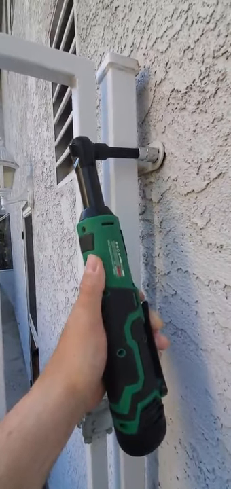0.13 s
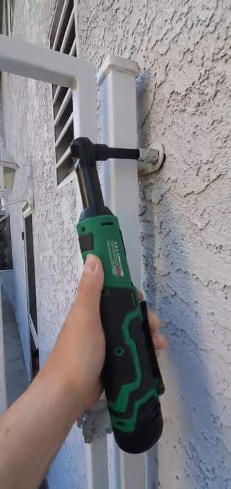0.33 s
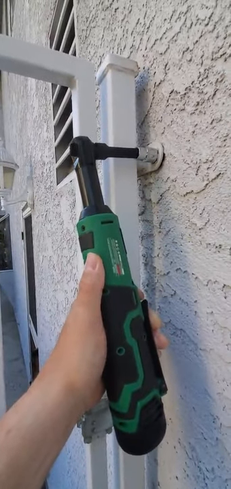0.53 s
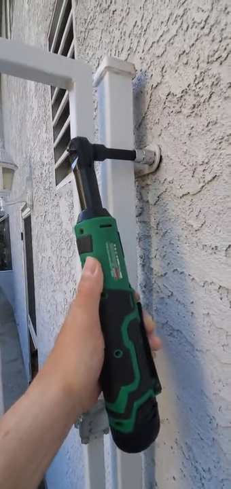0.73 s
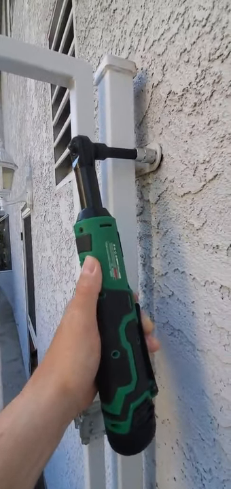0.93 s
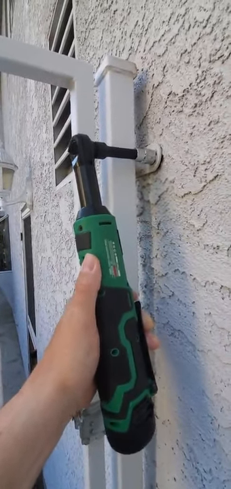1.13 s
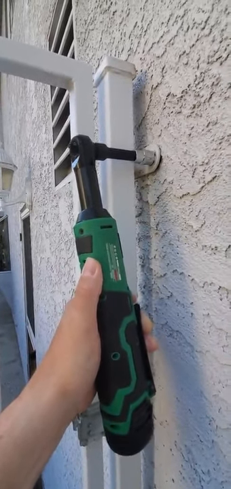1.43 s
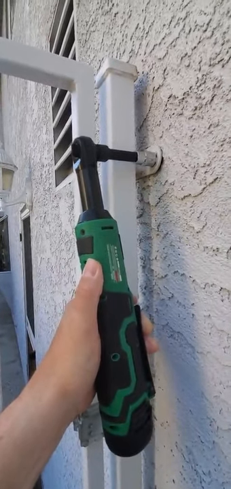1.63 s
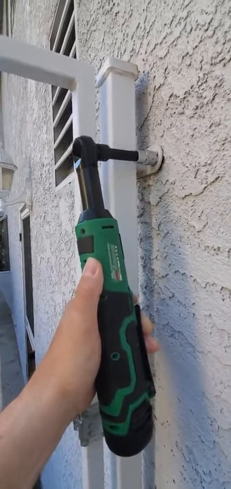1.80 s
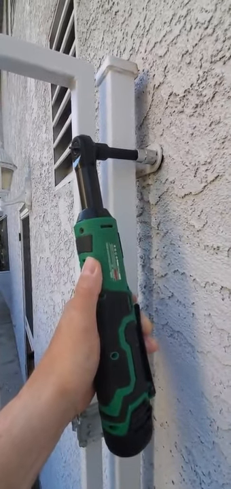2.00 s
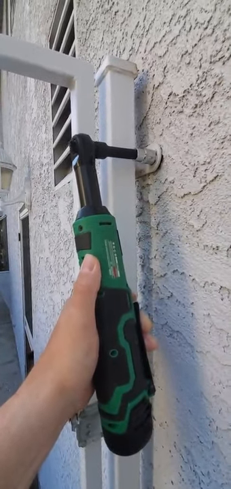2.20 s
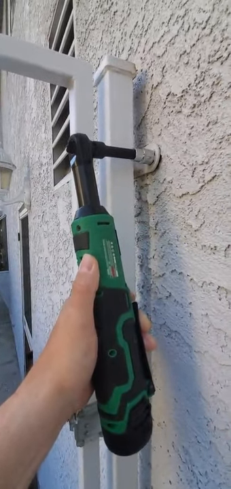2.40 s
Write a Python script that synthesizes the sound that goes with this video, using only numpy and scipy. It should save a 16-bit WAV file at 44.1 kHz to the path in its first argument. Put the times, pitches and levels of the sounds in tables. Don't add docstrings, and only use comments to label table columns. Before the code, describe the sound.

Close power ratchet clatter: hard metallic clicks speed up, ease off and quicken again outdoors

```python
import sys
import numpy as np
from scipy import signal
from scipy.fft import rfft, irfft, next_fast_len
from scipy.io import wavfile
from scipy.ndimage import uniform_filter1d

SR = 44100
rng = np.random.default_rng(int(sys.argv[2]) if len(sys.argv) > 2 else 0)


def gain_from_decibels(decibels):
    exponent = np.asarray(decibels, float) / 20
    return 10 ** exponent


def master(y):
    cut = np.clip(np.atleast_2d(y).T, -1, 1)
    pcm = np.round(cut * 32767)
    wavfile.write(sys.argv[1], SR, pcm.astype(np.int16))


N = 112455


def rms_one(x):
    return x / np.sqrt(np.mean(x ** 2) + 1e-20)


def in_time(rows):
    s, *columns = np.transpose(rows)
    return [np.interp(np.arange(N) / SR, s, column) for column in columns]


def at_hz(points, hz):
    table_hz, value = np.transpose(points)
    return np.interp(np.log(hz), np.log(table_hz), value)


def drift(rate_hz):
    r = np.exp(-2 * np.pi * rate_hz / SR)
    noise = rng.standard_normal(N + SR)
    return rms_one(signal.lfilter([1], [1, -2 * r, r * r], noise)[SR:])


def fade(x, t60):
    return signal.lfilter([1], [1, -gain_from_decibels(-60 / (t60 * SR))], x + 1e-18)


def band(x, low, high):
    # (pitch [Hz], likeness [0-1])
    likeness = [(60, 0.99), (130, .95), (250, 0.5), (600, 0.9), (1500, 0.18), (4000, 0.14), (9000, 0.17)]
    # (pitch [Hz], left over right [dB])
    left_over_right = [(60, -1), (180, .5), (350, 2.5), (800, 7.5), (2800, 3.5), (5500, 5.5), (9000, 11),
                       (14000, 8)]
    mid, side = signal.sosfilt(signal.butter(2, [low, high], "band", fs=SR, output="sos"), x)
    hz = np.sqrt(low * high)
    alike = np.clip(at_hz(likeness, hz), 0, 1)
    left_db = at_hz(left_over_right, hz) / 2
    ports = np.sqrt(1 + alike) * mid + np.sqrt(1 - alike) * side * [[1], [-1]]
    return gain_from_decibels(np.array([[left_db], [-left_db]])) * ports


def air():
    # (pitch [Hz], level [dB per Hz])
    air_colour = [(25, -40), (66, 10.5), (120, -7), (290, -28.5), (690, -57), (2500, -38), (5000, -36),
                  (9000, -52)]
    # (time [s], level [dB])
    breeze = [(0, -48.5), (.3, -52.5), (1.1, -51), (1.4, -56), (2.1, -66.5), (2.25, -50), (2.55, -52)]
    white = rng.standard_normal((2, 2, N))
    borders = np.geomspace(25, 16000, num=20)
    out = np.zeros((2, N))
    for k, (low, high) in enumerate(zip(borders[:-1], borders[1:])):
        lumps_db = at_hz(air_colour, np.sqrt(low * high)) + 2 * drift(0.69)
        out += gain_from_decibels(lumps_db) * band(white[k % 2], low, high)
    return gain_from_decibels(in_time(breeze)[0]) * rms_one(out)


def whine():
    # (time [s], pitch [Hz], level [dB])
    whine_path = [(0, 4343, -47.5), (.112, 4330, -49), (.118, 4696, -47.5), (.2, 4720, -42.5),
                  (.235, 4735, -43), (.255, 4740, -56), (.29, 4745, -48), (.315, 4745, -49),
                  (.335, 4745, -62), (.37, 4740, -52), (.47, 4740, -53), (.49, 4740, -62), (.53, 4735, -55),
                  (.58, 4720, -59), (.68, 4900, -110)]
    hz, db = in_time(whine_path)
    turn = 2 * np.pi * np.cumsum(hz) / SR
    stepped_up = np.arange(N) / SR > 0.115
    tone = np.sin(turn) * gain_from_decibels(8 * stepped_up * np.array([[-1], [1]]))
    for multiple, before_db, after_db in [(2, -11, -11), (3, -58, -15)]:
        tone = tone + gain_from_decibels(np.where(stepped_up, after_db, before_db)) * np.sin(multiple * turn)
    waver_db = 4 * (-0.4 + stepped_up) * np.array([drift(9.8), drift(81)])
    return np.sqrt(2) * gain_from_decibels(db + waver_db) * tone


def pawl_blows():
    # (time [s], tick peak [dB], knock [dB])
    switch = [
        (0.108, -51, -49),
        (1.408, -8, -66),
    ]
    # (time [s], tick peak [dB], knock [dB])
    creeping = [(0.223, -25.5, -59), (0.2404, -6, -43), (0.2467, -16, -61), (0.2506, -16, -54),
                (0.2536, -18, -55), (0.2689, -21, -23), (0.3197, -5.5, -64), (0.3464, -17.5, -20),
                (0.399, -9, -66), (0.4259, -18.5, -21.5), (0.4782, -11, -51), (0.508, -19, -20),
                (0.5601, -10.5, -56), (0.591, -17, -21), (0.627, -15.5, -54), (0.6398, -20, -16.5)]
    racing = [0.662, .674, 0.686, 0.696, 0.715, 0.728, 0.743, 0.757, 0.77, 0.786, 0.803, 0.841, 0.857,
              0.869, .883, .896, 0.913, 0.929, 0.939, 0.954, 0.97, 0.984, 0.996, 1.014, 1.024, 1.038, 1.056,
              1.072, 1.091]
    # (time [s], tick peak [dB])
    easing = [(1.1303, -15), (1.1493, -16.5), (1.1724, -17), (1.1962, -18.5), (1.222, -22), (1.242, -13.5),
              (1.281, -15.5), (1.2994, -25), (1.3132, -17.5), (1.3345, -14), (1.369, -17.5), (1.3848, -17),
              (1.4155, -16.5)]
    # (time [s], tick peak [dB], knock [dB])
    ticking = [(1.4484, -14.5, -54), (1.466, -97, -33), (1.4912, -7, -41), (1.509, -35, -31),
               (1.534, -10, -45), (1.5526, -41, -32.5), (1.578, -9.5, -43), (1.596, -35, -29),
               (1.62, -12.5, -36), (1.638, -38, -34.5), (1.6623, -8.5, -58), (1.68, -40, -38.5),
               (1.704, -11, -68), (1.723, -40, -34), (1.7478, -8, -51), (1.767, -38, -33.5),
               (1.7922, -9, -59), (1.8125, -28, -34.5), (1.838, -13, -52), (1.8509, -29, -27.5)]
    # (time [s], tick peak [dB], knock [dB])
    pulling = [(1.8718, -9, -44), (1.8833, -27, -37), (1.9025, -19, -52), (1.908, -14, -33.5),
               (1.93, -14, -31.5), (1.958, -11, -32), (1.971, -32, -31), (1.985, -13.5, -50),
               (2.0138, -11, -66), (2.0242, -35, -30), (2.0427, -8, -44), (2.0524, -14.5, -32.5),
               (2.0714, -11, -33), (2.0807, -19, -60), (2.0986, -14.5, -46), (2.126, -11.5, -45),
               (2.136, -14, -29.5), (2.1547, -24, -52), (2.1655, -19, -29.5), (2.1834, -28, -55),
               (2.1927, -25, -31),
               (2.1086, -12, -34), (2.211, -16, -51), (2.2144, -12, -55), (2.2212, -16, -31.5),
                  (2.24, -21, -54), (2.243, -14.5, -56), (2.2515, -6, -42), (2.2723, -14.5, -35),
                  (2.2802, -7, -29.5), (2.296, -12, -53), (2.3001, -9.5, -55), (2.309, -16.5, -42),
                  (2.338, -15, -25.5), (2.3601, -15, -40), (2.370, -30, -29), (2.388, -14, -34),
                  (2.398, -16, -44), (2.416, -26, -57), (2.427, -15, -29.5), (2.446, -25, -39),
                  (2.456, -12, -27.5), (2.472, -9, -37), (2.498, -9.5, -33), (2.524, -8, -37)]
    racing_ticks = [(s, -21.5) for s in racing]
    merged = [(s, db, db - 19) for s, db in racing_ticks + easing]
    return np.transpose(switch + creeping + merged + ticking + pulling)


def grit(rough_db, rate_hz):
    return rms_one(rng.standard_normal((2, 2, N)) * gain_from_decibels(rough_db * drift(rate_hz)))


def small_modes(x, count=110):
    t60_s, modes_db = 0.07, -1
    size = next_fast_len(N + SR // 4)
    hz = np.arange(size // 2 + 1) * SR / size
    lean = np.array([gain_from_decibels(10.2 * drift(2.24)) for _ in range(3)])
    lean = lean / np.sqrt(np.sum(lean ** 2, axis=0))
    out = 0
    for share in lean:
        response = np.ones((2, len(hz)), complex)
        for pitch, a, b in rng.random((count, 3)):
            mode_hz = 800 * 19 ** pitch
            width_hz = 1.1 / t60_s * (mode_hz / 1000) ** 0.55
            first = int((mode_hz - 12 * width_hz) * size / SR)
            last = int((mode_hz + 12 * width_hz) * size / SR)
            near = slice(first, last)
            strength = gain_from_decibels(modes_db) * np.array([[4 * a - 2], [4 * b - 2]])
            response[:, near] += strength / (1 + 1j * (hz[near] - mode_hz) / width_hz)
        response = response / np.sqrt(uniform_filter1d(np.abs(response) ** 2, size=size // 50))
        out = out + irfft(rfft(share * x, size) * response, size)[:, :N]
    return out


def resonance(x, hz, width_hz):
    r = np.exp(-np.pi * width_hz / SR)
    return signal.lfilter([(1 - r * r) / 2, 0, (r * r - 1) / 2], [1, -2 * r * np.cos(2 * np.pi * hz / SR), r * r], x)


def held(x):
    # (time [s], handle ring [dB], shell ring [dB], depth of the first hollow [0-1])
    grip = [(0, 0, -6, 0.7), (.28, 4, 7, .3), (.6, 0.5, 4.5, 0.18), (.7, -3, -22, 0.5), (.82, -13, -5, .98),
            (.9, 2.5, 4, .95), (.99, -9, -8, 0.7), (1.05, 5, 16.5, 0.37), (1.12, 3, -1, 0.1),
            (1.28, 2.5, 7, 0), (1.5, 2, -20, .7), (1.8, -6, -8, 0.3), (1.92, 7.5, 5.5, .95),
            (2.05, 2, -15, 1), (2.2, 3.5, -2, 0), (2.28, 0.5, -8, 0.9), (2.4, 2, -14, 0.35),
            (2.55, 2, 7, 0.34)]
    # (pitch [Hz], width [Hz], level [dB])
    shell = [(581, 59, 0), (845, 27, 1.5), (975, 68, -2)]
    # (pitch [Hz], width [Hz])
    hollows = [(1580, 200), (2700, 110), (3290, 90), (5360, 120), (7400, 300), (10200, 400), (4750, 70),
               (8600, 200)]
    handle_db, shell_db, depth = in_time(grip)
    handle = gain_from_decibels(14 + handle_db) * resonance(x.mean(axis=0), 181.2, 12.3)
    out = small_modes(x)
    for hz, width_hz, db in shell:
        out = out + gain_from_decibels(db + shell_db) * resonance(x, hz, width_hz)
    for k, (hz, width_hz) in enumerate(hollows):
        share = np.clip(depth if k == 0 else 0.7 + 0.35 * drift(5), 0, 1)
        for shift in (0.96, 1.04) if k == 0 else (1, 1):
            out = out - share * resonance(out, hz * shift, width_hz)
    return out + handle


def ratchet():
    # (time [s], effort [dB], looseness of the head [dB])
    gear_grind = [(0, -76, -7), (.12, -93, 9), (.18, -47.5, -7), (.23, -44.5, -8.5), (.26, -47, -0.5),
                  (.61, -46.5, -3), (.665, -29, 1), (.81, -34, 4.5), (.86, -31, 4.5), (1.06, -32.5, 3),
                  (1.15, -38, 2.5), (1.38, -44.5, 2), (1.45, -47.5, 0.5), (1.83, -48.5, -2.5),
                  (1.9, -42, 1.5), (2.2, -43, -0.5), (2.42, -39, 3), (2.55, -37, 2)]
    # (pitch [Hz], level [dB per Hz])
    housing = [(110, -5.5), (182, -2), (330, -5), (600, -7.5), (980, -2), (1580, -1.5), (2400, -1)]
    # (pitch [Hz], level [dB per Hz])
    neck = [(2400, -5), (2700, -4), (3590, -1), (5310, -2), (6400, -2), (7400, -11), (9500, -5.5)]
    # (pitch [Hz], level [dB per Hz])
    head = [(9500, -10), (10200, -16), (11300, -9.5), (13200, -2), (15000, -5), (16200, -3)]
    # (time to fall 60 dB [s], level [dB])
    ring_on = [
        (.04, -17),
        (0.102, -7),
        (0.199, 4),
    ]
    s, tick_db, knock_db = pawl_blows()
    at = (s * SR).astype(int)
    effort_db, loose_db = in_time(gear_grind)
    rattle, gears, flutter = grit(2.96, 1160), grit(3.3, 1400), drift(19)
    tick = gain_from_decibels(np.minimum(tick_db, -12) - 13.5)
    knock = gain_from_decibels(knock_db - 10)

    contact, snap = int(0.0045 * SR), 0.00039 * SR
    swell = np.bartlett(2 * contact)[None] ** 1.7
    swell = swell + gain_from_decibels(1) * np.exp(-np.abs(np.arange(2 * contact) - contact) / snap)

    housing_grind_db = effort_db - 10 - 0.88 * loose_db
    parts = [(head, np.geomspace(9500, 16200, num=8), tick, 0 * tick, effort_db + loose_db),
             (neck, np.geomspace(2400, 9500, num=12), knock, tick * gain_from_decibels(-16), effort_db),
             (housing, np.geomspace(110, 2400, num=11), knock * gain_from_decibels(-13), 0 * tick, housing_grind_db)]
    out = np.zeros((2, N))
    for (colour, borders, blow, crack, grind_db), (t60, ring_db) in zip(parts, ring_on):
        gains = gain_from_decibels(at_hz(colour, np.sqrt(borders[1:] * borders[:-1])))
        gains = gains / np.sqrt(np.sum(gains ** 2 * np.diff(borders)) / (SR / 2))
        chance = gain_from_decibels(2 * rng.standard_normal((len(s), len(gains))))
        if colour is head:
            catch_db = np.clip(knock_db - tick_db + 3, -10, 10)
            chance = chance * gain_from_decibels(0.18 * np.outer(catch_db, np.linspace(-0.5, 0.5, len(gains))))
        for k, gain in enumerate(gains):
            blows = np.zeros((2, N))
            blows[:, at] = [(blow + crack) * chance[:, k], blow * chance[:, k]]
            push = signal.oaconvolve(blows, swell, axes=1)[:, contact // 2 + 20:][:, :N]
            shape = push[0] + gain_from_decibels(ring_db) * fade(push[1] / swell.sum(), t60)
            dull_db = 0
            if colour is neck:
                octaves = max(np.log2(borders[k] / 1670), 0)
                dull_db = 0.25 * np.minimum(effort_db + 41.5, 0) * octaves
            grind = gain_from_decibels(grind_db + dull_db + 0.51 * flutter + 2.45 * drift(12.7))
            noise = shape * rattle[k % 2] + grind * gears[k % 2]
            out += gain * band(noise, borders[k], borders[k + 1])
    return held(out)


def scene():
    return air() + whine() + ratchet()


def band_limit(x):
    return signal.sosfilt(signal.butter(12, 16950, fs=SR, output="sos"), x)


def record(dry):
    lag = 12
    late = np.array([dry[0], np.pad(dry[1], (lag, 0))[:N]])
    rounded = np.tanh(late)
    top_cut = signal.cheby2(12, 32, 16050, fs=SR, output="sos")
    return band_limit(signal.sosfilt(top_cut, rounded))


dry = scene()
out = record(dry)
master(out)
```